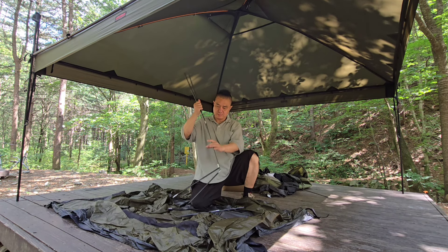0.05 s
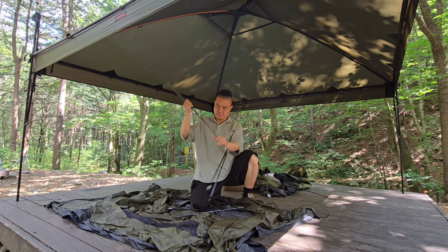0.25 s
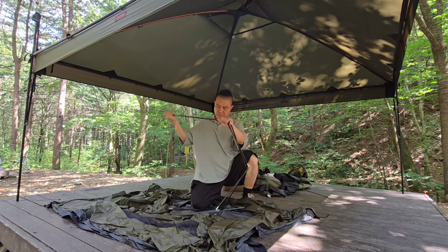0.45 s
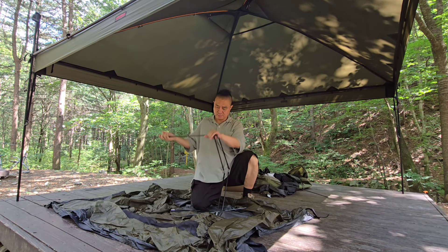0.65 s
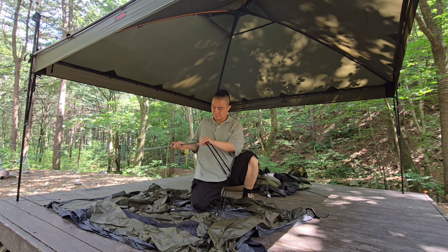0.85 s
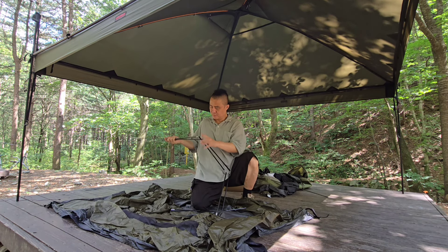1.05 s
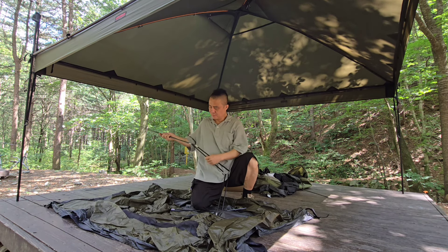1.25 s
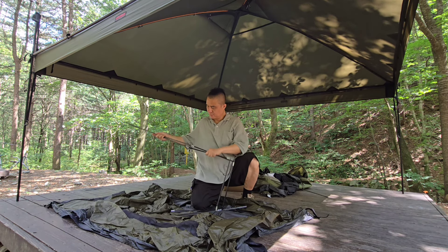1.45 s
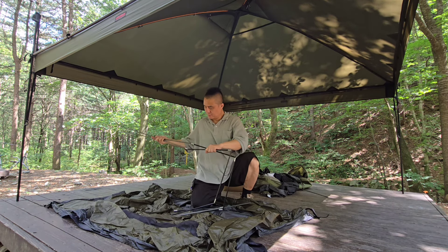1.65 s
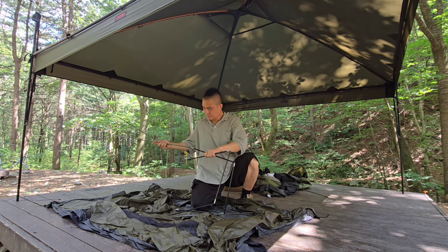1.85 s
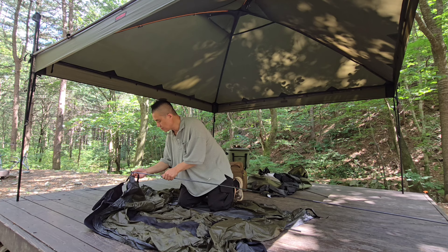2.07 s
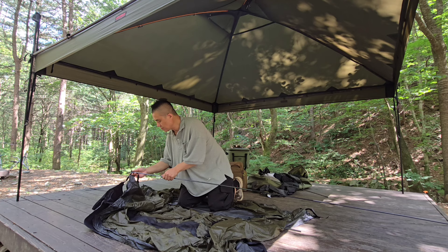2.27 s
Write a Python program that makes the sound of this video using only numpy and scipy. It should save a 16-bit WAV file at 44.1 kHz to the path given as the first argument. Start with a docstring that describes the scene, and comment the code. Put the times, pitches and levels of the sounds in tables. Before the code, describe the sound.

Light clacks and short scrapes of thin poles being joined outdoors, over dull thuds from wooden boards and a soft hiss.

```python
"""Thin pole sections are fitted together on a wooden deck under a canopy in a forest.
First the ends rub and chatter while something bumps the boards; they snap home at 0.5 and 0.8 s.
A lull holds one faint slide and a dull bump. From 1.5 s come lighter clacks and short slides,
and the deck booms softly under shifting weight. Throughout, the canopy throws each clack straight
back, the trees add a faint longer tail, and the forest air hisses softly."""
import sys
import numpy as np
from scipy import signal
from scipy.fft import rfft, irfft, next_fast_len
from scipy.io import wavfile
from scipy.ndimage import uniform_filter1d

SR = 44100
rng = np.random.default_rng(int(sys.argv[2]) if len(sys.argv) > 2 else 0)


def transcribe(u):
    """Save the signal u as a 16-bit wav file named by the first command-line argument.

    u: samples, shape (n,) or (channels, n), limited to [-1, 1]; the rate is SR.
    q: integer samples, one column per channel.
    """
    v = np.clip(np.atleast_2d(u).T, -1, 1)
    q = np.round(v * 32767).astype(np.int16)
    wavfile.write(sys.argv[1], SR, q)


N = 106281


def pole_clacks(lead_s=0.004):
    """Pole hits pole; yields (start_s, sound, echo_db)."""
    # hit_s, level_db, decay_s, low_mid_db, treble_db, ring_db, lower_hz, upper_hz
    hits = [(0.0717, -33, 0.0038, 2, -4, -12, 3160, 10340), (.225, -36, 0.0022, -4, -3, -17, 3150, 4740),
            (0.3597, -56.5, 0.0044, -3, 1, -11, 3270, 4540), (.3897, -61.5, 0.002, 2, 7, -17, 4200, 8300),
            (0.4651, -52.5, .0042, 0.5, -22, -12, 2340, 4300),
            (.4950, -22, 0.0064, -13, -1.5, -12.5, 2256, 3210),
            (0.6005, -43, .005, -2.5, -0.5, -11, 3420, 4470),
            (0.6445, -42, 0.0026, -10, -5, -18, 4450, 11600),
            (0.7877, -48, 0.0012, 6.5, -6, -12, 4520, 9600),
            (.7940, -21.5, 0.0027, -11, 2.5, -6, 2500, 8260), (1.543, -56, 0.0069, -4, -4, -3, 2950, 4160),
            (1.582, -44.5, 0.0025, -6.5, 1.5, -15, 1200, 4170),
            (1.6173, -43.5, .002, -10, -5, -21, 2810, 3870), (1.8399, -56.5, .0037, -5, 3, -12, 2180, 4180),
            (1.908, -50.5, 0.0019, -11, -5, -12, 4220, 5000), (1.94, -51, 0.0085, -5, 2.5, -13, 1460, 2020),
            (2.111, -47, .0028, -1.5, -2.5, -14, 1870, 5660),
            (2.152, -36.5, 0.0016, -16.5, -0.5, -18, 4900, 7060),
            (2.282, -65.5, .004, 0, 5, -15, 1400, 12100), (2.375, -60, 0.0023, -4, -10, -15, 2680, 4330)]
    # echo send, strongest for light ticks and hard snaps: level_db, echo_db
    echo_curve = [(-55.5, -2.5), (-36.5, -7.5), (-19.5, -4)]
    for hit_s, level_db, *contact in hits:
        echo_db = np.interp(level_db, *np.transpose(echo_curve))
        yield hit_s - lead_s, clack(level_db, *contact, lead_s), echo_db


def clack(level_db, decay_s, low_mid_db, treble_db, ring_db, lower_hz, upper_hz, lead_s,
          rise_s=0.0014, span_s=0.0081, pan_left_db=1.9):
    """The ends scrape, hit and chatter in a dense dying burst of tiny contacts."""
    # contact spectrum: freq_hz, gain_db
    contact_eq = [(60, -23.5), (250, -8.5), (600, -3.5), (1050, -3.5), (1700, -2.5), (2400, 0.5),
                  (3300, 2.5), (5000, -0.5), (8000, -1.5), (11000, -3), (14500, -1), (16000, -19)]
    hit_eq = [(1750, low_mid_db), (2300, -4), (4000, -4), (6000, 0), (9000, 0), (11500, treble_db)]
    t = np.arange(SR // 7) / SR - lead_s
    hold_s = decay_s / 2  # ends stay pressed together
    envelope = np.exp(np.minimum(t / rise_s, -np.maximum(t - hold_s, 0) / decay_s))
    force = np.tanh(noise_pair(len(t), correlation=0.19)) * envelope
    vibration = tube(force, ring_db) + grip_notes(force, lower_hz, upper_hz, level_db)
    sound = colour(bending_waves(vibration), contact_eq, hit_eq)
    sound *= np.sqrt(span_s * SR / np.sum(sound ** 2, axis=1, keepdims=True))  # energy of span_s at rms 1
    return sound * amp([[level_db + pan_left_db / 2], [level_db - pan_left_db / 2]])


def tube(force, ring_db=-14):
    """A contact radiates directly and rings the tube modes."""
    # freq_hz, t60_s, level_db
    tube_modes = [(1240, 0.045, -9), (1387, 0.032, 6), (1930, 0.074, -13), (2690, 0.046, -28),
                  (3110, 0.078, -11.5), (3347, 0.047, 1.5), (3846, 0.06, -15.5), (4510, 0.042, -1),
                  (6114, 0.08, -0.5), (6670, 0.053, -8), (6750, 0.12, -9), (8030, 0.048, -19.5),
                  (8560, .05, -4), (9020, 0.15, 4), (10120, 0.15, 2), (10294, 0.17, 2.5),
                  (11860, 0.076, -3), (12380, 0.16, 2), (14330, 0.1, -3)]
    return force + amp(ring_db) * convolve(force, ring(tube_modes, np.arange(SR // 7) / SR))


def grip_notes(force, lower_hz, upper_hz, level_db, usual_db=-42, width_hz=230):
    """Grip and contact point favour two hand-damped notes; harder blows drown them."""
    lift_db = 10 - 0.22 * (level_db - usual_db)
    peaks = [signal.iirpeak(hz, hz / width_hz, fs=SR) for hz in (lower_hz, upper_hz)]
    return (amp(lift_db) - 1) * sum(signal.lfilter(b, a, force) for b, a in peaks)


def bending_waves(x, travel_s=0.0035, size=1024):
    """Low bending waves run slower along the tube: treble arrives first."""
    hz = np.fft.rfftfreq(size, 1 / SR)
    slowness = np.sqrt(1000 / (hz + 500))
    delay_s = travel_s * (slowness - slowness[-1])
    phase_rad = -2 * np.pi * np.cumsum(delay_s) * hz[1]
    return convolve(x, irfft(np.exp(1j * phase_rad))[:size // 2])


def pole_slides(bright_db=-57.5, grain_db=3.5, echo_db=-4):
    """Rough walls rub, driving the tube modes; yields (start_s, sound, echo_db)."""
    # one section sliding in another: start_s, end_s, level_db, swell_db
    rubs = [(0, 0.023, -51, -15), (0.471, 0.51, -41, 7.5), (.598, 0.698, -53, -11),
            (1.001, 1.083, -63.5, 10), (1.588, 1.623, -49.5, 5), (2.095, 2.148, -60, 7)]
    for start_s, end_s, level_db, swell_db in rubs:
        size = int((end_s - start_s) * SR)
        grain = amp(grain_db * unit_rms(uniform_filter1d(rng.standard_normal(size), 60)))
        envelope = amp(np.linspace(0, swell_db, size)) * signal.windows.tukey(size, 0.2)
        friction = noise_pair(size, correlation=0.067) * grain * envelope
        treble_db = 2.6 * min(level_db - bright_db, 0)  # light rubs are duller
        rub_eq = [(500, -9), (1600, -20), (3200, 3.5), (6000, treble_db / 2), (12000, treble_db)]
        sound = colour(tube(np.pad(friction, ((0, 0), (0, SR // 8)))), rub_eq)
        yield start_s, amp(level_db) * sound * np.sqrt(size) / np.linalg.norm(sound[0]), echo_db


def deck_thuds(echo_db=-10):
    """Bumps and shifting weight drive boards and frame; yields (start_s, sound, echo_db)."""
    # blows on the deck: start_s, knock_gain_db, boom_gain_db, pitch_hz
    blows = [(0.046, -49, -57.5, 107), (.074, -43.5, -51, 110.8), (.117, -69, -51, 150),
             (.19, -71, -62, 119.3), (.496, -64, -60, 194), (1.235, -60, -61.5, 98.8),
             (1.315, -82, -65, 86.7), (1.69, -70, -67, 70.4), (1.808, -81, -65.5, 74.4),
             (2.232, -85, -55.5, 90.5), (2.284, -88, -57.5, 99), (2.363, -97, -57.5, 66.7)]
    t = np.arange(SR // 3) / SR
    for start_s, knock_gain_db, boom_gain_db, pitch_hz in blows:
        sound = amp(knock_gain_db) * board_knock(t) + amp(boom_gain_db) * frame_boom(t, pitch_hz)
        yield start_s, sound, echo_db


def board_knock(t, rise_s=0.0018, span_s=0.016, scuff_db=-5, scuff_decay_s=0.031):
    """A bumped board rings with a dull scuff."""
    # freq_hz, t60_s, level_db
    board_modes = [(248, 0.48, -11), (398, 0.072, -1.5), (516, 0.11, 2), (688, 0.034, 0.5),
                   (760, 0.11, -32), (908, 0.065, -46)]
    board = ring(board_modes, t, spread_rad=np.pi / 8) * np.sqrt(span_s * SR)
    scuff_eq = [(80, -19), (200, -5.5), (550, -1.5), (900, -20), (2000, -30)]
    scuff = unit_rms(colour(noise_pair(len(t), correlation=1), scuff_eq)) * np.exp(-t / scuff_decay_s)
    return (board + amp(scuff_db) * scuff) * (1 - np.exp(-t / rise_s))


def frame_boom(t, pitch_hz, rise_s=0.0076):
    """The deck frame swells into a short boom; lower booms last longer."""
    # pitch_ratio, level_db
    frame_modes = [(0.701, -12), (0.999, 0), (1.379, -4.5)]
    decay_s = 0.045 * (92.3 / pitch_hz) ** 2.28
    tone = sum(amp(db) * np.sin(2 * np.pi * ratio * pitch_hz * t) for ratio, db in frame_modes)
    envelope = (1 - np.exp(-t / rise_s)) * np.exp(-t / decay_s)
    return 2 * tone * envelope * amp([[-1], [1]])  # slightly right


def surroundings(x, onset_s=0.0055, hold_s=0.015, canopy_t60_s=0.13, tree_t60_s=0.48, taps_per_s=6000):
    """Dense echoes from canopy and deck die fast; scatter from the trees lingers."""
    t = np.arange(SR * 2 // 5) / SR
    taps = rng.standard_normal((2, len(t))) * (rng.random((2, len(t))) < taps_per_s / SR)
    canopy = taps * amp(-60 * np.maximum(t - hold_s, 0) / canopy_t60_s)
    scatter = rng.permuted(taps, axis=1) * amp(-21 - 60 * t / tree_t60_s)
    trees = colour(scatter, [(300, 6.9), (3000, 6.1), (9000, 12), (15000, 3.1)])
    response = diffuse(canopy + trees) * np.clip(t / onset_s, 0, 1) ** 2
    return convolve(x, response / np.linalg.norm(response, axis=1, keepdims=True))


def forest_air(level_db=-65.5, waver_db=0.5, waver_below_hz=8):
    """Soft diffuse wash that wavers a little."""
    # still air: freq_hz, relative_density_db
    air_spectrum = [(18, -45), (30, -3), (88, -8), (164, -19.5), (230, -6.5), (673, -10.5), (728, -8),
                    (852, -14.5), (1290, -13.5), (1910, -13), (7460, -21.5), (8720, -24), (14300, -26.5),
                    (15500, -40)]
    size = next_fast_len(N, real=True)
    hz = np.fft.rfftfreq(size, 1 / SR)
    white = rfft(rng.standard_normal((2, size)))
    wash = diffuse(irfft(white * amp(log_interp(air_spectrum, hz)), size))
    waver = unit_rms(irfft(rfft(rng.standard_normal(size)) * (hz < waver_below_hz), size))
    return (amp(level_db + waver_db * waver) * unit_rms(wash))[:, :N]


def diffuse(x):
    """Sound from all sides: ears alike in the bass, unrelated in the treble."""
    # freq_hz, left_right_correlation
    coherence = [(60, 0.57), (250, 0.65), (600, 0.41), (1500, 0.12), (4000, 0.048), (12000, 0.0223)]
    a, b = rfft(x)
    c = log_interp(coherence, np.fft.rfftfreq(x.shape[1], 1 / SR))
    return irfft(np.array([a, c * a + np.sqrt(1 - c ** 2) * b]), x.shape[1])


def ring(modes, t, spread_rad=np.pi):
    """Decaying modes, random phase per ear; dB sets each mode's share of the energy."""
    out = 0
    for hz, t60_s, db in modes:
        phase_rad = rng.uniform(-spread_rad, spread_rad, (2, 1))
        out += amp(db - 60 * t / t60_s) / np.sqrt(t60_s) * np.sin(2 * np.pi * hz * t + phase_rad)
    return out / np.linalg.norm(out[0])


def noise_pair(size, correlation):
    """Correlated stereo white noise."""
    a, b = rng.standard_normal((2, size))
    return np.array([a, correlation * a + np.sqrt(1 - correlation ** 2) * b])


def colour(x, *curves, size=2048):
    """Minimum-phase filter from summed (freq_hz, gain_db) curves."""
    hz = abs(np.fft.fftfreq(size, 1 / SR))
    log_gain = np.log(amp(sum(log_interp(points, hz) for points in curves)))
    response = np.fft.ifft(np.exp(np.conj(signal.hilbert(log_gain)))).real
    return convolve(x, response[:size // 2])


def convolve(x, response):
    """Per channel, length kept."""
    return signal.fftconvolve(x, np.atleast_2d(response), axes=1)[:, :x.shape[1]]


def log_interp(points, hz):
    """Interpolates over log frequency."""
    freq_hz, value = np.transpose(points)
    return np.interp(np.log(hz + 1), np.log(freq_hz + 1), value)


def amp(db):
    return 10 ** (np.asarray(db) / 20)


def unit_rms(x):
    return x / np.sqrt(np.mean(x ** 2) + 1e-20)


def add(mix, start_s, sound):
    part = mix[:, max(round(start_s * SR), 0):][:, :sound.shape[-1]]
    part += sound[..., :part.shape[1]]


def scene():
    """Poles and deck, direct and echoed, over forest air."""
    direct, echo_send = np.zeros((2, 2, N))
    for start_s, sound, echo_db in [*pole_clacks(), *pole_slides(), *deck_thuds()]:
        add(direct, start_s, sound)
        add(echo_send, start_s, amp(echo_db) * sound)
    return direct + surroundings(echo_send) + forest_air()


def record(dry, low_cut_hz=52, high_cut_hz=15500):
    """Bass roll-off and band limit."""
    highpass = signal.butter(2, low_cut_hz, "highpass", fs=SR, output="sos")
    lowpass = signal.firwin(151, high_cut_hz, window=("kaiser", 8), fs=SR)
    return signal.oaconvolve(signal.sosfilt(highpass, dry), lowpass[None], "same")


dry = scene()
out = record(dry)
transcribe(out)
```